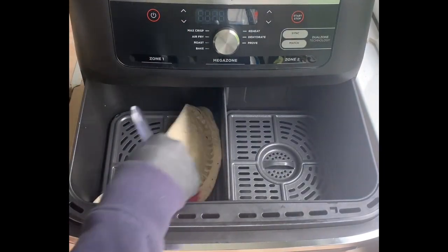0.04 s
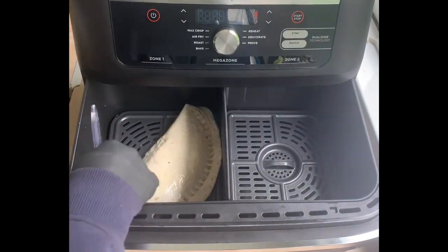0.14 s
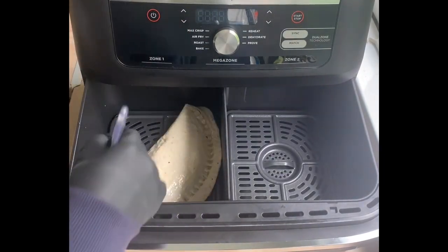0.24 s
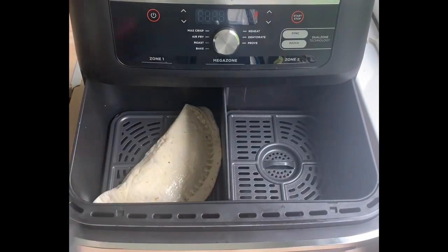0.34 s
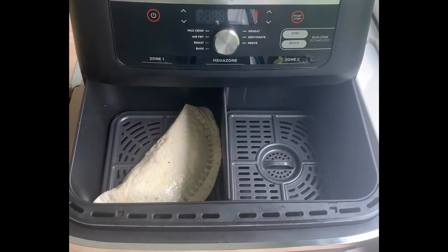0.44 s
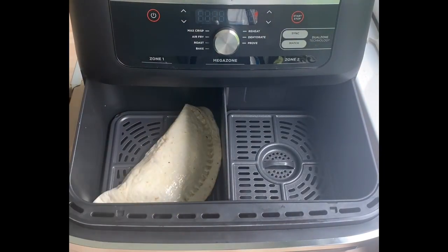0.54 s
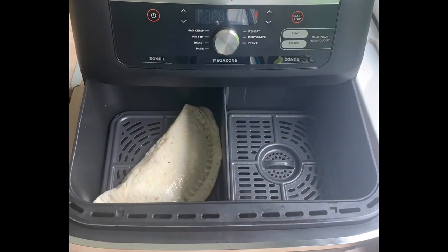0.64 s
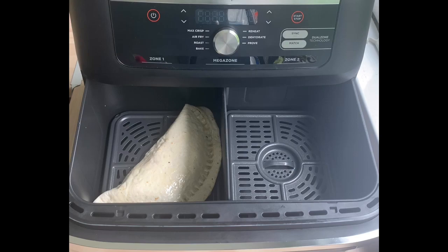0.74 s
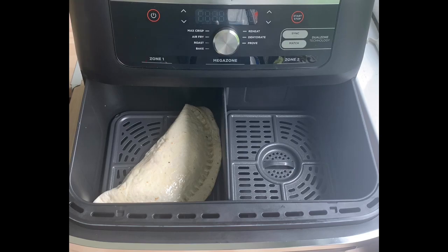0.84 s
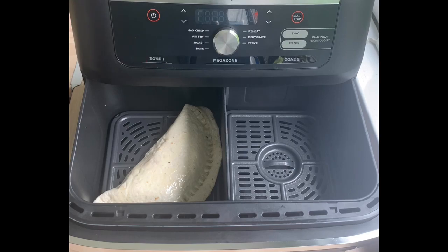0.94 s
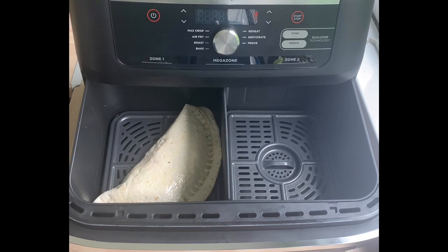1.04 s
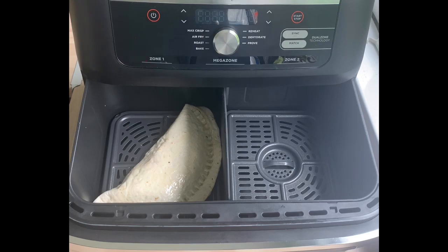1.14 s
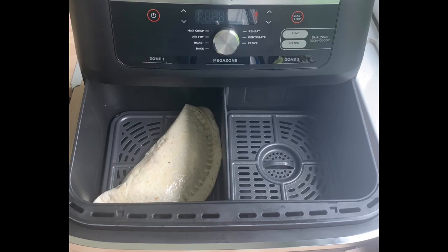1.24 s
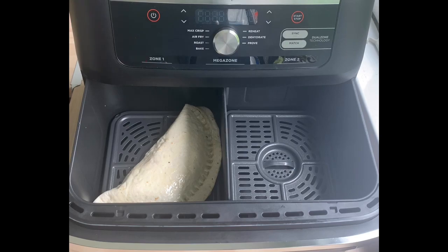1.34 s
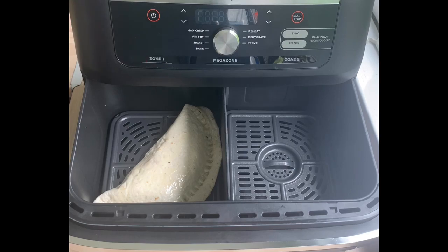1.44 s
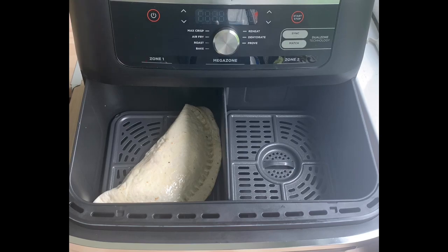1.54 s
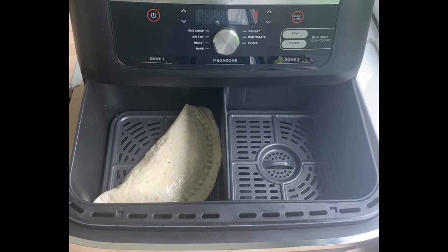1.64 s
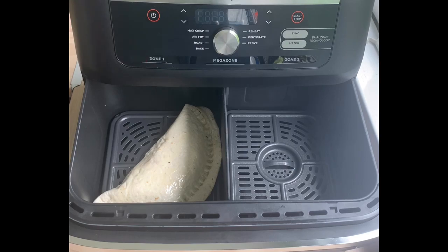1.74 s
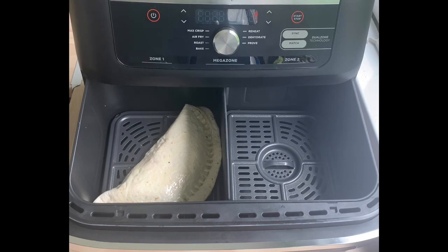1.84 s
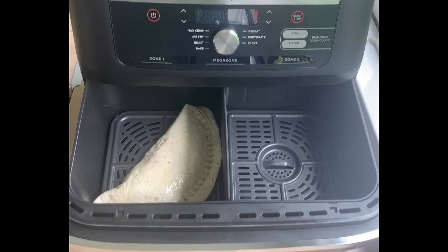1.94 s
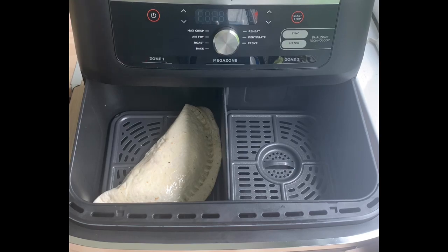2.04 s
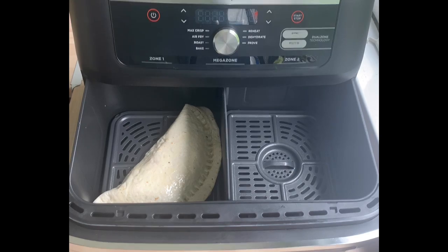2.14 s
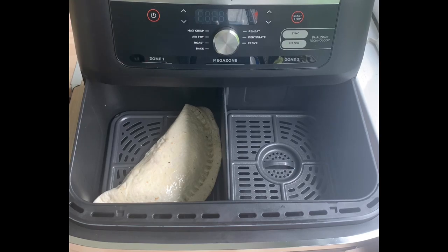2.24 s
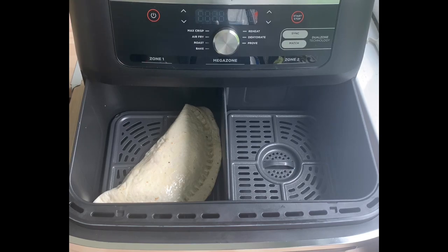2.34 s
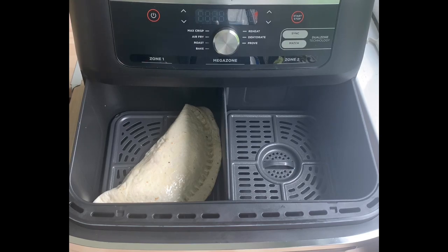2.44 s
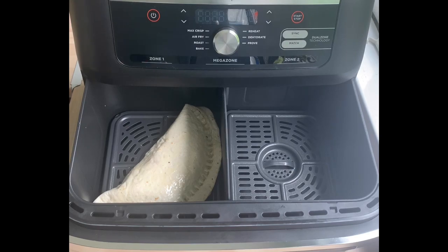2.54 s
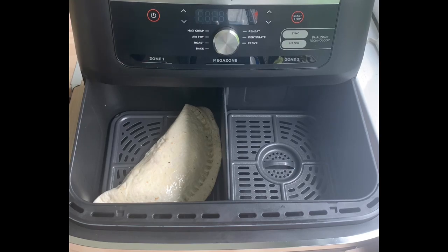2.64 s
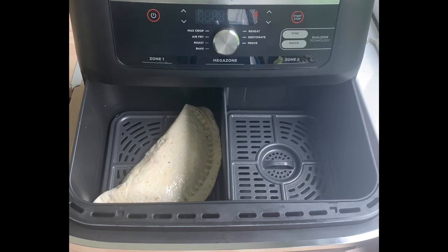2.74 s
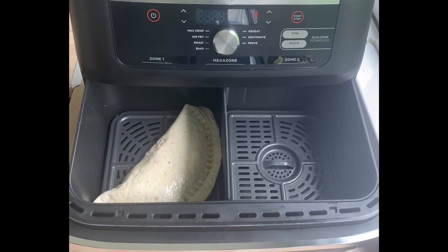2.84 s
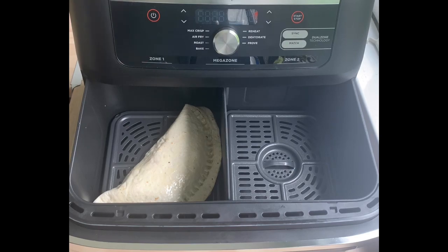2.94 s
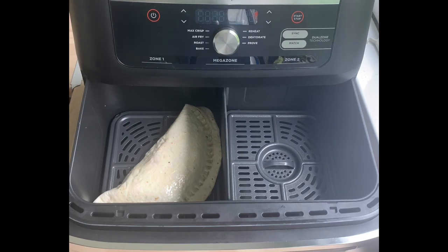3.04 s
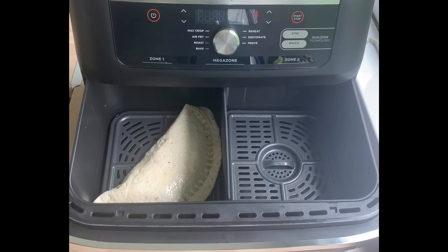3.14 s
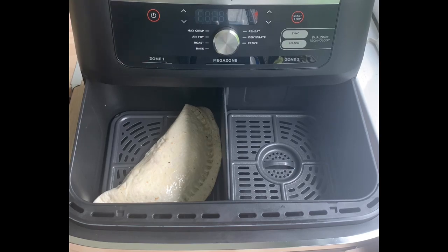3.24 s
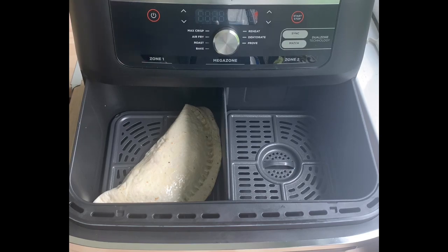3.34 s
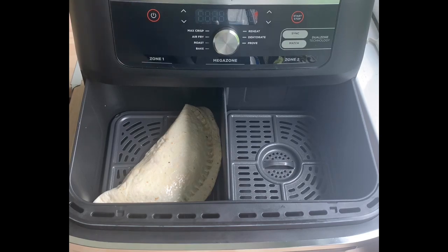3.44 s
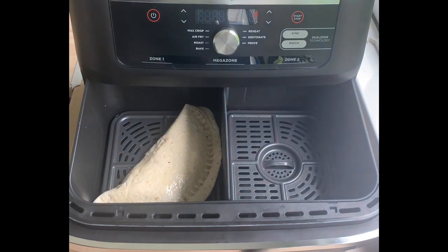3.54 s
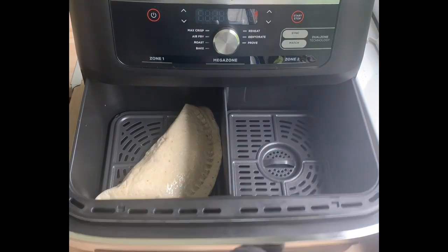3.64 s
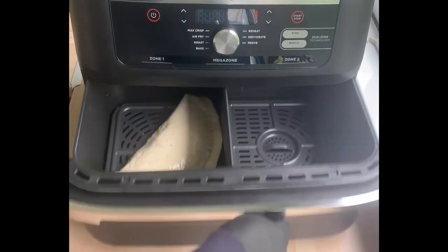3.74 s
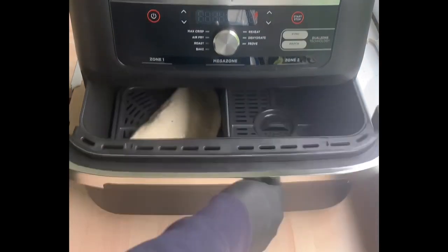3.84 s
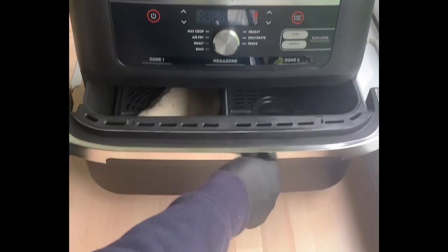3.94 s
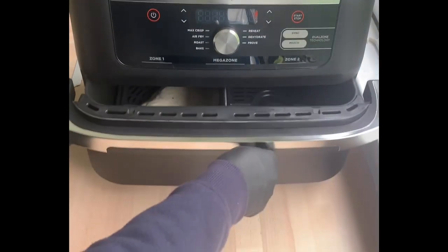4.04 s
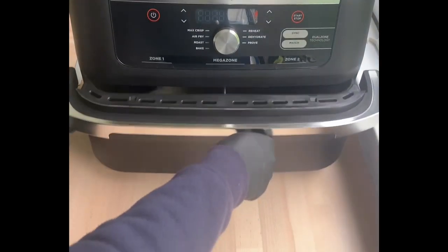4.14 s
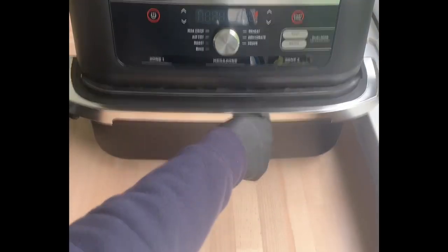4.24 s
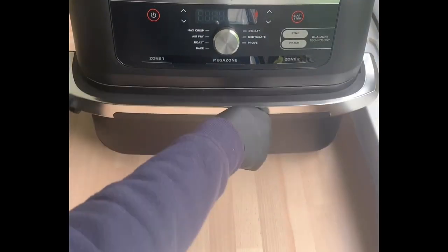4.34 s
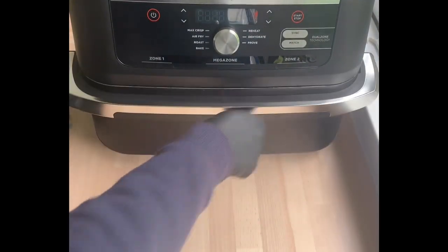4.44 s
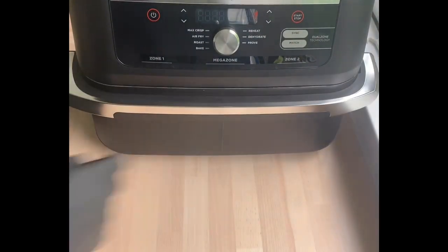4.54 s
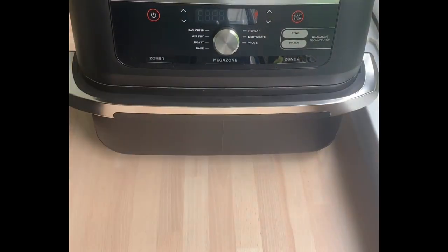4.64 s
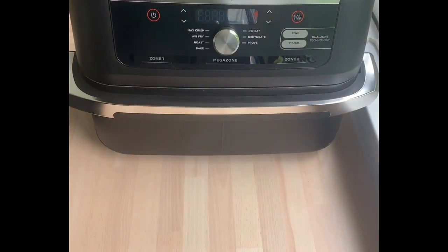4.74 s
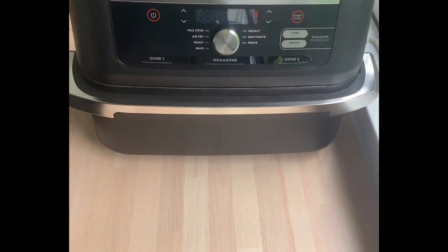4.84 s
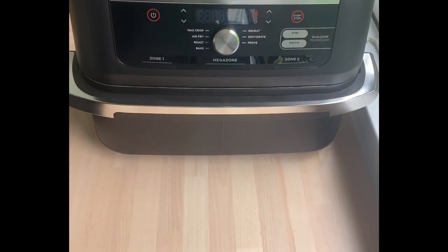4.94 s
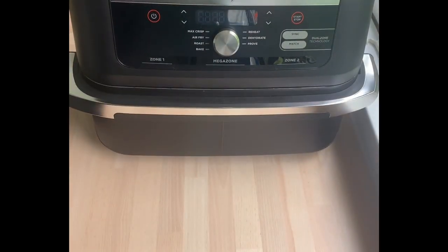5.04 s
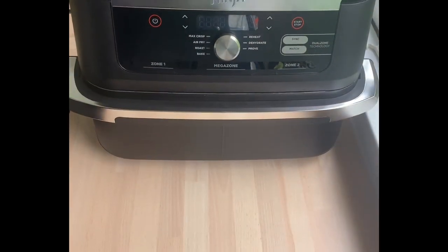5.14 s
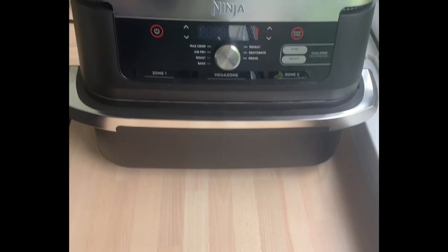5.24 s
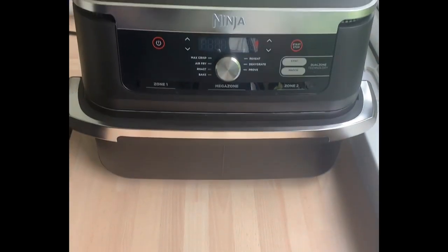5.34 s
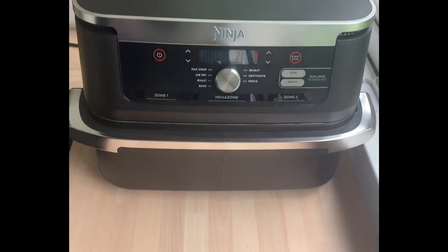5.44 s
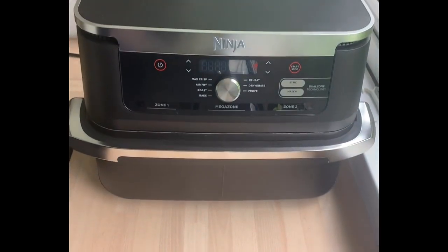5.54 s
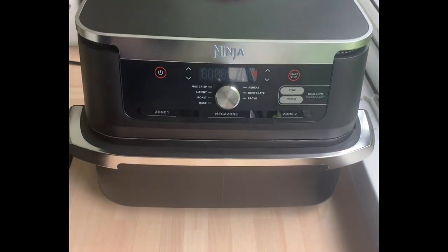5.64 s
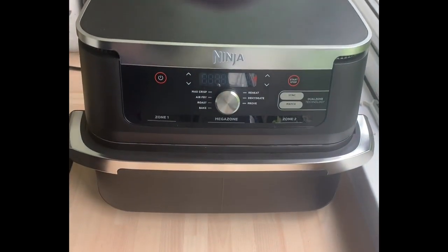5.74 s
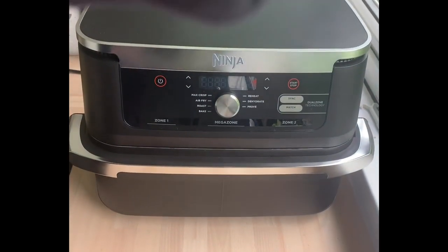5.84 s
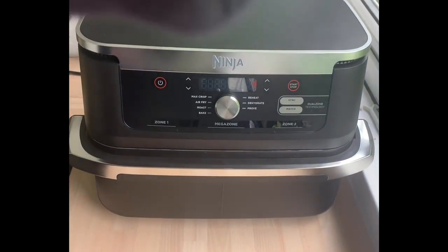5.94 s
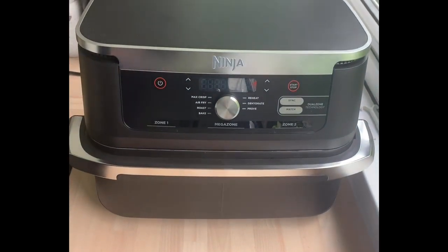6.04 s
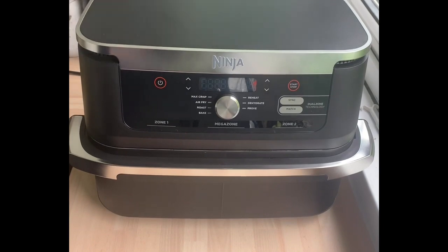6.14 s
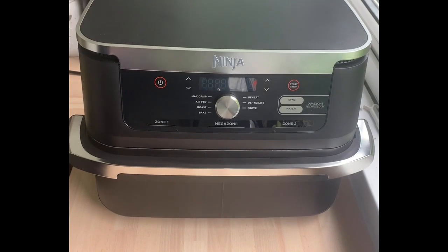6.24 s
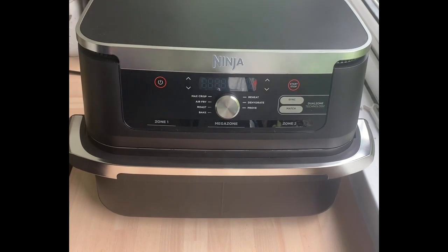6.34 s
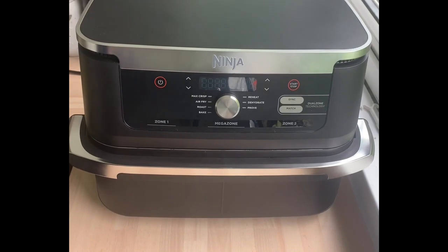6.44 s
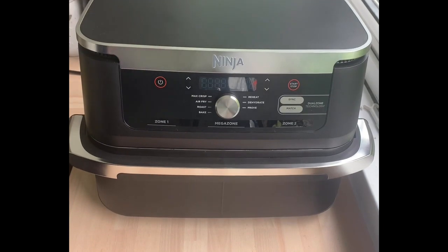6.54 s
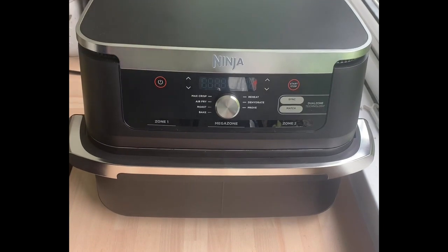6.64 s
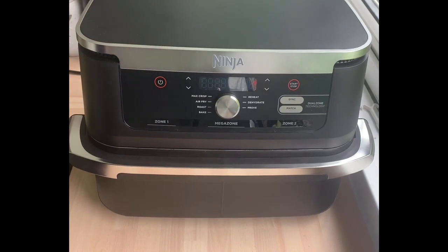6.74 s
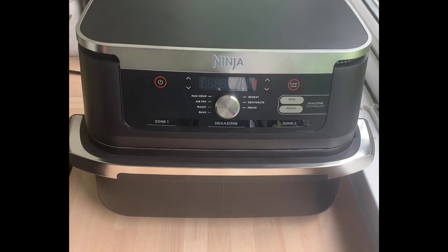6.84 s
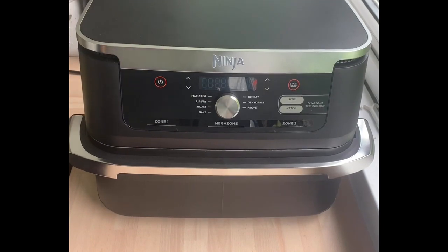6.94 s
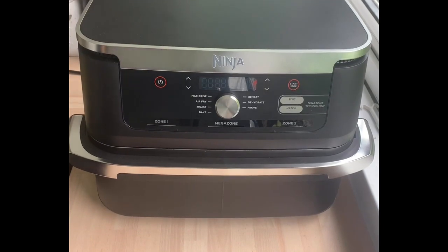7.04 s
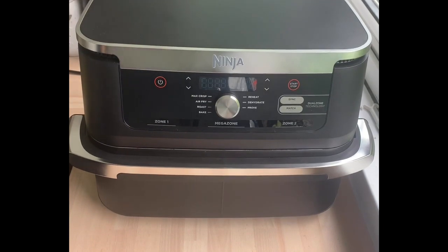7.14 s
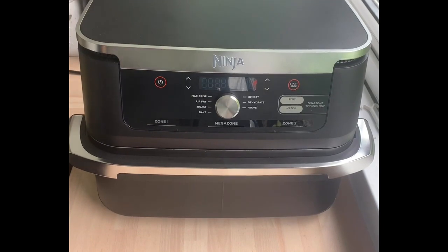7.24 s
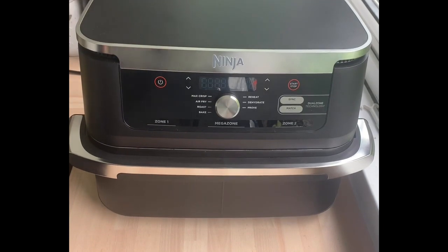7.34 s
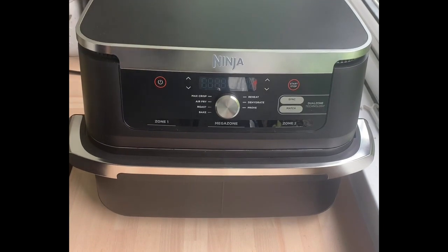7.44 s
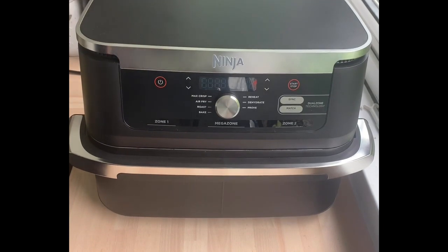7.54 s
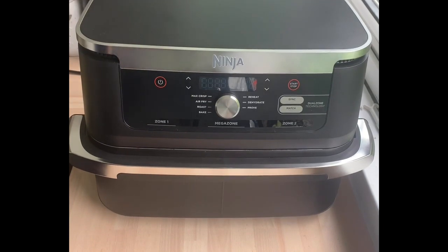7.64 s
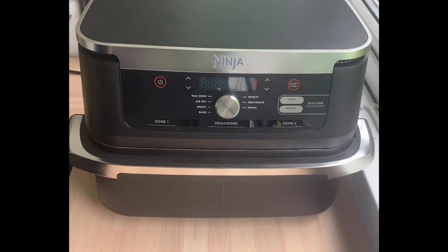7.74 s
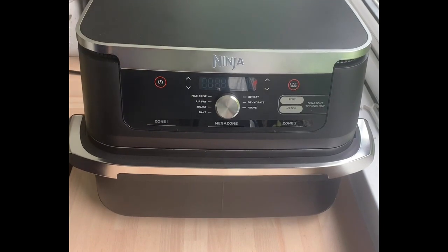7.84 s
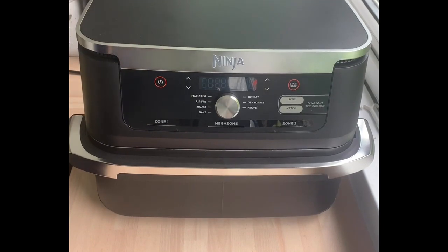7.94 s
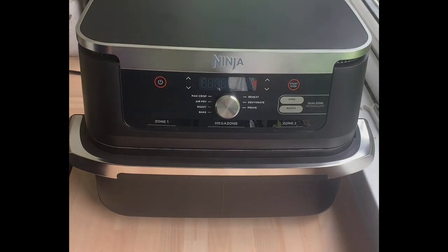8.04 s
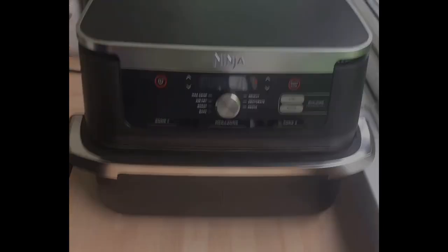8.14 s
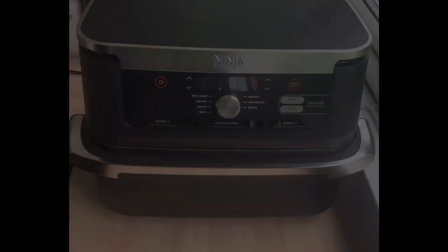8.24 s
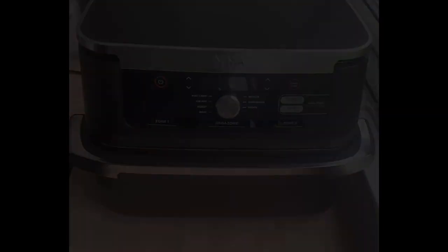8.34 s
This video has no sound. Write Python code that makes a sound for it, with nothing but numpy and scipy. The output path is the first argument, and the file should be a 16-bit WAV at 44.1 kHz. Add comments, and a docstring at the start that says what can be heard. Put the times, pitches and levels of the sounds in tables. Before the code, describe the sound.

A low, faint room tone runs throughout in a quiet kitchen, heard through a close hand-held microphone. From about 0.3 seconds a sleeve rustles softly. Near 1 second a utensil is put down with a brief scrape and light clicks. Dull worktop knocks follow, with a bright clink near 1.9 seconds and a small hollow clunk around 2.4. From 3.6 seconds an air fryer drawer is pushed in, much louder: it rumbles, rubs and bumps along its plastic runners, briefly ringing its metal pan and the cabinet. It slows around 4 seconds, bumps again, then the latch snaps and the front knocks home sharply near 4.4. Fingers tap on the microphone's case around 5 seconds, and once more strongly at 6. A few small clicks and a soft knock come near 7 seconds, and light handling taps just after 8.

```python
"""An air fryer in a quiet kitchen, close in front of a hand-held microphone, over a low room tone. First a
sleeve rustles, a utensil is put down with a scrape and light clicks, and things knock and clunk on the worktop;
someone breathes faintly twice. From 3.6 s the drawer is pushed in: it rumbles and bumps along its runners,
ringing its metal pan and the cabinet, until the latch snaps and the front knocks home near 4.4 s. Afterwards
fingers tap on the microphone's case and a few small things click nearby."""
import sys
import numpy as np
from scipy import signal
from scipy.fft import rfft, irfft, next_fast_len
from scipy.io import wavfile
from scipy.ndimage import map_coordinates

SR = 44100
rng = np.random.default_rng(int(sys.argv[2]) if len(sys.argv) > 2 else 0)


def int16_out(signal):
    """Quantize to a 16-bit WAV file."""
    q = np.round(np.clip(np.atleast_2d(signal).T, -1, 1) * 32767)
    wavfile.write(sys.argv[1], SR, q.astype(np.int16))


N = 369999
TIME = np.arange(N) / SR
AGE = TIME[:SR // 2]   # time since a contact [s]
SIDES = np.array([[1], [-1]])   # left, right

# how alike the microphone's two channels are: (frequency [Hz], correlation [-1..1])
STEREO_LIKENESS = [(100, 0.91), (550, 0.85), (850, 0.39), (1400, 0.2), (2800, -0.34), (5000, -0.2),
                   (10000, 0.29)]
# the quiet kitchen: (frequency [Hz], level [dB])
ROOM_SPECTRUM = [(25, -34), (55, -23.5), (85, 0), (150, -3), (200, 3.5), (240, -11.5), (310, 4.5), (355, 3),
                 (420, -12), (620, -9), (850, -13.5), (1400, -24.5), (3500, -32.5), (11000, -39.5)]
# low ring left in the cabinet and the room: (frequency [Hz], level [dB])
AFTERRING_SPECTRUM = [(60, -31.5), (105, 2.5), (180, -8.5), (270, -4), (330, -6), (400, -15), (600, -9.5),
                      (1000, -21), (3000, -37.5)]
# sleeve and hand, and two faint breaths near 2.9 s and 3.5 s: (middle [s], half length [s], level [dB], corner
# [Hz], treble fall [dB/octave])
RUSTLES_AND_BREATHS = [(.386, 0.066, -61, 3660, 7), (0.506, 0.091, -57.5, 5650, 7), (0.796, 0.046, -59, 4400, 9),
                       (1.12, 0.081, -56.5, 2600, 10), (2.139, 0.11, -57.5, 1880, 10),
                       (2.409, 0.061, -55, 1080, 9), (2.627, 0.09, -52.5, 6130, 9),
                       (2.787, 0.05, -62.5, 2000, 24), (2.94, 0.19, -67.5, 2150, 26),
                       (3.458, 0.19, -66, 4700, 8), (4.679, 0.29, -70, 2480, 8), (5.075, 0.058, -68, 3940, 7),
                       (5.088, 0.05, -54, 1100, 17), (6.521, 0.11, -65.5, 1986, 10),
                       (7.343, .15, -64.5, 5020, 8), (7.452, 0.042, -61, 2185, 9), (8.123, 0.028, -53, 1000, 9)]
# fingers right on the microphone: (time [s], level [dB], pitch [Hz], hollow ring [dB])
MICROPHONE_TAPS = [(4.9272, -34, 560, -44), (5.082, -46, 1000, -58), (5.137, -47.5, 930, -62),
                   (5.192, -57, 700, -52), (5.9748, -21.5, 360, -36), (8.130, -44, 565, -47.5),
                   (8.150, -34.5, 185, -48)]
# the microphone's hollow case: (frequency [Hz], level [dB])
CASE_SPECTRUM = [(70, -34), (120, 1), (250, -1.5), (370, -1.5), (520, -2), (900, -5.5), (1500, -20.5),
                 (2500, -29.5), (6000, -57)]
# resonances of the dragged utensil: (frequency [Hz], width [Hz], level [dB])
SCRAPE_MODES = [(1800, 280, -2.5), (2300, 270, 5.5), (2640, 210, 1), (3150, 280, -4), (3700, 270, -8),
                (4160, 200, -11), (4550, 240, -4), (5200, 340, -10), (8200, 580, 3)]
# utensil and other small hard things nearby: (time [s], click [dB], centre [Hz], t60 [s], ring [dB])
LIGHT_CLICKS = [(.365, -63, 2500, 0.1, -70), (0.608, -65.5, 3000, 0.13, -73), (.678, -54, 3020, 0.06, -59),
                (.862, -55, 2800, 0.055, -59), (.887, -51, 2500, 0.045, -60),
                (.9515, -35.5, 5700, 0.051, -47), (0.968, -46, 3780, .06, -52),
                (0.995, -50, 4230, 0.13, -60), (1.096, -58, 2010, .05, -66), (1.1111, -39, 3800, .055, -50),
                (1.134, -55, 2200, .06, -61), (1.478, -68, 4200, 0.13, -77),
                (1.593, -52.5, 2640, 0.15, -52), (1.746, -68.5, 5040, 0.1, -74),
                (1.782, -70.5, 4870, 0.089, -72), (1.867, -67.5, 3570, 0.21, -79),
                (1.923, -41, 3140, 0.19, -54), (1.9298, -32.5, 4300, .07, -29.5),
                (2.014, -58, 2960, .08, -58), (2.09, -58.5, 6760, 0.13, -80),
                (2.417, -54.5, 3000, 0.12, -62), (5.956, -57, 7970, 0.054, -80),
                (6.844, -47.5, 2880, 0.25, -65), (6.939, -51.5, 3070, .13, -51),
                (6.952, -38, 5700, .14, -60), (8.114, -54, 7500, .08, -72)]
# the struck utensil: (frequency [Hz], level [dB], t60 [s])
UTENSIL_MODES = [(2485, -10, 0.077), (2720, -10, .1), (3030, -8.5, 0.13), (3150, -6, 0.066),
                 (3930, -7.5, 0.092), (4000, -12, 0.13), (4600, -18, .12), (4840, -12, .08),
                 (5580, -12, .11), (5720, -12, 0.12), (6460, -19, .09), (6573, -20, 0.11),
                 (6950, -21, 0.13), (7400, -24, .14), (7600, -17, .06), (9300, -24, .16)]
# something shoved aside judders: (time [s], level [dB])
CLUNK_JUDDERS = [(2.376, -44.5), (2.3825, -45.5), (2.396, -44.5), (2.418, -52), (2.4395, -46.5)]
# that hollow object's ring: (frequency [Hz], level [dB], t60 [s])
CLUNK_MODES = [(525, -8, .08), (585, 2.5, 0.118), (705, -1.5, 0.17), (1063, -4, .05), (1417, -3.5, 0.083),
               (2024, -3, 0.076), (2230, -5, .07)]
# dull knocks on the worktop: (time [s], thump [dB], pitch [Hz], board [dB], hollow sound [dB])
WORKTOP_KNOCKS = [(.395, -66, 300, -53, -62), (.887, -47, 323, -56, -49), (.978, -56.5, 300, -57, -54),
                  (1.48, -54, 320, -68, -68), (1.593, -37, 293, -47.5, -50.5),
                  (1.747, -52.5, 303, -70, -75), (1.921, -60, 345, -45.5, -41),
                  (2.119, -38, 325, -46, -38.5), (2.375, -43, 450, -61, -46), (2.428, -45, 280, -54.5, -47),
                  (3.096, -61.5, 297, -54, -59.5), (6.855, -52, 300, -48.5, -48.5),
                  (8.177, -43.5, 110, -67, -64)]
# the worktop's hollow sound: (frequency [Hz], level [dB])
WORKTOP_SPECTRUM = [(60, -61), (120, 3.5), (200, -9.5), (320, 1.5), (450, -10), (650, -11.5), (1200, -23),
                    (3000, -85)]
# the body, cabinet and drawer together: (frequency [Hz], t60 [s], level open [dB], level shut [dB])
BODY_MODES = [(104, 0.18, -16.5, -20), (152, .12, -22, -18.5), (212, .15, -26, -15),
              (245, .14, -28.5, -18.5), (316, 0.11, -26, -13), (361, 0.15, -14, -13.5),
              (389, .14, -16.5, -28), (433, 0.19, -14.5, -23.5), (453, 0.12, -13, -26),
              (498, 0.043, -25, -22), (563, .10, -26, -23)]
# the drawer's metal pan: (frequency [Hz], t60 [s], level open [dB], level shut [dB])
METAL_PAN_MODES = [(616, 0.18, -1, -13), (740, 0.18, -19.5, -4.5), (775, .15, -14.5, 1),
                   (840, 0.17, -1, -14), (926, .10, -8, -19), (1128, .14, -11.5, -19),
                   (1233, .10, -25, -11.5), (1324, .13, -24.5, -9), (1436, .09, -10, -21),
                   (1590, .06, -21.5, -18.5), (1810, .10, -14, -17.5), (2070, .08, -12, -17),
                   (2380, .08, -26, -20), (2610, 0.088, -24, -10.5), (2800, 0.11, -18.5, -23),
                   (2910, .10, -18.5, -24.5), (3260, .06, -27, -20.5), (3460, .09, -18, -25.5)]
# the drawer is pushed in, checked, then pressed home: (time [s], speed [share of top speed])
DRAWER_SPEED = [(3.57, 0.044), (3.70, 0.33), (3.81, 0.97), (3.90, 0.82), (4.03, 0.34), (4.14, 0.52),
                (4.27, 0.62), (4.39, 0.2)]
# it binds on entering the cabinet and at the seal: (start [s], length [s], extra rumble [dB])
DRAWER_BINDS = [(3.785, .125, 10.5), (4.205, 0.06, 18.5)]
# the loose basket rattling: (frequency [Hz], level [dB])
BASKET_SPECTRUM = [(90, -2.5), (200, -5.5), (420, -5), (600, -7), (850, -6), (1200, -21), (2000, -29),
                   (4000, -28.5), (9000, -50)]
# plastic rubbing on the runners: (frequency [Hz], level [dB])
RUBBING_SPECTRUM = [(300, 3), (800, 6), (1300, -1.5), (2000, 0), (3200, -1.5), (4200, -6), (5500, -9.5),
                    (8000, -13), (12000, -20)]
# bumps on the runners: (time [s], thump [dB], pitch [Hz], clack [dB], pan ring [dB], body ring [dB])
RUNNER_BUMPS = [(3.590, -47, 111, -72, -70, -48), (3.635, -45, 300, -57, -49, -45),
                (3.656, -41.5, 278, -56, -50, -42), (3.682, -39.5, 107, -64.5, -62.5, -37),
                (3.7561, -15.5, 475, -29.5, -20.5, -26), (3.774, -23, 490, -46, -45, -28),
                (3.8008, -26.5, 600, -33.5, -28, -31), (3.8060, -21, 350, -44, -45, -25),
                (3.826, -29, 110, -52, -45, -38), (3.8505, -25, 590, -41, -33.5, -29),
                (3.859, -28, 108, -52, -45, -33), (3.8765, -24, 340, -47, -40, -30),
                (3.9187, -15.5, 425, -46, -32, -18), (3.9275, -24, 410, -48, -38, -25),
                (4.1985, -38, 350, -32.5, -35, -34), (4.2052, -25, 290, -40, -30.5, -23),
                (4.2218, -21, 270, -45.5, -48, -21), (4.234, -28, 120, -38, -39, -31),
                (4.2533, -19, 320, -31, -22, -22), (4.259, -23, 260, -47.5, -50, -24),
                (4.2645, -28, 130, -27.5, -26, -29), (4.2736, -21.5, 250, -38.5, -33, -22.5)]
# mid-range clack of struck plastic: (frequency [Hz], level [dB])
CLACK_SPECTRUM = [(250, -19.5), (500, -1), (850, 0.5), (1200, -7.5), (1900, -5.5), (2800, -12.5),
                  (4000, -18.5), (7000, -41.5), (12000, -50)]
# bright crack of a hard contact: (frequency [Hz], level [dB])
CRACK_SPECTRUM = [(700, -25), (2000, -16.5), (3200, 0.5), (4300, -2.5), (5600, -1), (7500, -4), (9000, -3),
                  (11000, -8.5), (13000, -8)]
# short-lived modes of the plastic latch: (frequency [Hz], level [dB])
LATCH_MODES = [(2794, -7.5), (4310, -9.5), (4716, -8), (5140, -6.5), (5490, -5.5), (5585, -5), (5890, -7),
               (6164, -7), (6550, -6.5), (7150, -8), (7382, -5), (7481, -6), (7940, -6.5), (9647, -6.5),
               (10800, -10), (11580, -9.5)]

BODY_SHUT_S, PAN_SHUT_S = (3.93, 4.2), (3.86, 3.93)   # each passes from its open to its shut ring
ENTER_S, LATCH_S, SEAT_S = 3.8, 4.3485, 4.3675   # the drawer enters the cabinet, latches, knocks home


def amp(db):
    """Decibels to gain."""
    return 10 ** (np.asarray(db) / 20)


def rms_one(x):
    """Scale to rms 1."""
    return x / np.sqrt(np.mean(x ** 2) + 1e-20)


def at_hz(points, hz):
    """Read a table along log frequency."""
    freqs, values = np.transpose(points)
    return np.interp(np.log(hz + 1e-3), np.log(freqs), values)


def dying(t60, t=AGE):
    """Exponential decay, 60 dB in t60 seconds."""
    return np.exp(-np.log(1000) * t / t60)


def envelope(start, attack, hold, t60):
    """Straight rise, hold, exponential release."""
    t = TIME - start
    return np.clip(t / attack, 0, 1) * dying(t60, np.maximum(t - attack - hold, 0))


def add(out, s, sound):
    """Mix a sound in at time s."""
    start = round(s * SR)
    out[..., start:start + sound.shape[-1]] += sound[..., :N - start]


def low_cut(x, hz, order):
    """Roll off the bass below hz."""
    return signal.sosfilt(signal.butter(order, hz, "high", fs=SR, output="sos"), x + 1e-18)


def excite(force, response):
    """A force played through a stereo impulse response."""
    return signal.oaconvolve([force], response, axes=1)[:, :N]


def noise(spectrum, size=len(AGE)):
    """Stereo noise of a given colour, alike in both channels in the bass only; rms 1."""
    length = next_fast_len(size)
    hz = np.fft.rfftfreq(length, 1 / SR)
    alike = at_hz(STEREO_LIKENESS, hz)
    mid, side = rfft(rng.standard_normal((2, length)))
    stereo = np.sqrt(1 + alike) * mid + np.sqrt(1 - alike) * side * SIDES
    return rms_one(irfft(stereo * amp(at_hz(spectrum, hz)), length)[:, :size])


def hump(hz, below_db, above_db):
    """A broad spectrum round hz, falling by so many dB an octave for four octaves on each side."""
    return [(hz / 16, -4 * below_db), (hz, 0), (hz * 16, -4 * above_db)]


def wander(per_s, size):
    """A random curve with per_s new values a second."""
    steps = rng.standard_normal(int(size / SR * per_s) + 2)
    return np.interp(TIME[:size] * per_s, np.arange(len(steps)), steps)


def grain(per_s, depth_db, size=N):
    """A randomly wavering gain; rms 1."""
    return rms_one(amp(depth_db * wander(per_s, size)))


def slips(per_s):
    """Stick-slip: small impulses of random size at random times."""
    return rng.standard_normal(N) * (rng.random(N) < per_s / SR)


def ringing(modes):
    """Ring of (frequency [Hz], level [dB], t60 [s]) modes; high ones reach the channels out of step."""
    out = 0
    for hz, db, t60 in modes:
        skew = np.arccos(at_hz(STEREO_LIKENESS, hz)) / 2
        out = out + amp(db) * dying(t60) * np.sin(2 * np.pi * hz * AGE + skew * SIDES)
    return out * (1 - np.exp(-AGE / 0.0025))   # the vibration takes a moment to spread


def thump(hz, cycles, sharpness):
    """A heavily damped panel swings for a few cycles after a blunt contact."""
    swell = AGE * hz / cycles
    return (swell * np.exp(1 - swell)) ** sharpness * np.sin(2 * np.pi * hz * AGE)


def crowded_modes(x, spacing_hz=105, depth_db=6.0):
    """Plastic shells have many close modes: a fine comb of random peaks and dips above the bass."""
    length = next_fast_len(x.shape[-1])
    hz = np.fft.rfftfreq(length, 1 / SR)
    heights = rng.standard_normal(int(SR / spacing_hz))
    comb_db = depth_db * np.interp(hz / spacing_hz, np.arange(len(heights)), heights) * hz / (hz + 1000)
    return rms_one(irfft(rfft(x, length) * amp(comb_db), length)[:, :x.shape[-1]])


def burst(spectrum, t60, snap, snap_t60):
    """Dense high modes of a hard thing: a brief direct snap, then a short diffuse ring."""
    rise = 1 - np.exp(-AGE / 0.0011)
    return crowded_modes(noise(spectrum)) * rise * (dying(t60) + snap * dying(snap_t60))


def brushing(corner_hz, fall_db, size=N):
    """Friction noise: fine grains that come in gentle clumps."""
    fibres = crowded_modes(noise(hump(corner_hz, below_db=0, above_db=fall_db), size))
    clumps = grain(per_s=45, depth_db=1.8, size=size)
    return fibres * grain(per_s=250, depth_db=2, size=size) * clumps


def room_tone():
    """The kitchen behind it all: faint low noise whose level wavers a little."""
    waver = grain(per_s=10, depth_db=1.5)
    return amp(-60.2) * noise(ROOM_SPECTRUM, N) * waver


def afterring(sounds):
    """The cabinet and the room keep a faint low ring long after the blows."""
    t = TIME[:2 * SR]
    tail = noise(AFTERRING_SPECTRUM, len(t)) * dying(1.9, t)
    tail /= np.sqrt(np.sum(tail[0] ** 2))
    return amp(-35.5) * excite(sounds.mean(0), tail)


def rustles_and_breaths():
    """Cloth and skin brush near the microphone in short rounded swells; two faint breaths come in the same way."""
    out = np.zeros((2, N))
    for s, half_s, db, corner_hz, fall_db in RUSTLES_AND_BREATHS:
        size = round(2 * half_s * SR)
        add(out, s - half_s, amp(db) * np.hanning(size) ** 1.9 * brushing(corner_hz, fall_db, size))
    return out


def finger_taps(first_hz=1800, settle_s=0.0021):
    """Bending waves in the microphone's case bring the highs first: taps chirp down to a hollow ring."""
    out = np.zeros((2, N))
    contact = 1 - np.exp(-AGE / 0.0008)
    for s, db, hz, hollow_db in MICROPHONE_TAPS:
        phase = 2 * np.pi * (hz * AGE + (first_hz - hz) * settle_s * (1 - np.exp(-AGE / settle_s)))
        chirp = amp(db - 4.5) * dying(0.052) * np.sin(phase - 0.54 * SIDES)
        hollow = amp(hollow_db) * noise(CASE_SPECTRUM) * dying(0.12)
        tick = amp(db - 28.5) * burst(CRACK_SPECTRUM, t60=0.046, snap=1.7, snap_t60=0.0044)
        add(out, s, contact * (chirp + hollow) + tick)
    return out


def utensil_scrape():
    """The utensil drags as it is put down: it hisses and crackles, each slip catching one resonance."""
    corners_s = 0.774 + np.cumsum([0, 0.095, 0.14, 0.067])   # start, rise, hold, release
    pressure = np.interp(TIME, corners_s, [0, 1, 1, 0])
    modes = [(hz, db, np.log(1000) / (np.pi * width)) for hz, width, db in SCRAPE_MODES]
    crackle = sum(excite(slips(per_s=81), ringing([mode])) for mode in modes)
    hiss = brushing(corner_hz=4600, fall_db=7)
    return pressure * (amp(-57) * rms_one(crackle) + amp(-57.5) * hiss)


def clicks(spread_db=0.5):
    """Light hard contacts nearby; each one strikes the utensil's modes a little differently."""
    out = np.zeros((2, N))
    for s, db, centre_hz, t60, ring_db in LIGHT_CLICKS:
        spectrum = hump(centre_hz, below_db=3, above_db=12)
        add(out, s, amp(db) * burst(spectrum, t60, snap=0.21, snap_t60=0.0094))
        modes = [(hz, level + rng.normal(0, spread_db), decay) for hz, level, decay in UTENSIL_MODES]
        add(out, s, amp(ring_db) * ringing(modes))
    return out


def clunk(dulling_db_per_s=134):
    """Gritty slips ring a shoved hollow object, ever duller as the contact softens and comes to rest."""
    out = np.zeros((2, N))
    for s, db in CLUNK_JUDDERS:
        dull_db = -dulling_db_per_s * (s - CLUNK_JUDDERS[0][0])
        modes = [(hz, level + dull_db * (hz > 1000), t60) for hz, level, t60 in CLUNK_MODES]
        grit = burst(hump(1500, below_db=2.5, above_db=13), t60=0.075, snap=0.6, snap_t60=0.015)
        add(out, s, amp(db) * (ringing(modes) + amp(dull_db - 4.5) * grit))
    return out


def worktop_knocks(board_hz=127, board_lag_s=0.015):
    """Things set down thump and ring briefly at their own pitch; the worktop answers, low and hollow."""
    out = np.zeros((2, N))
    board = thump(board_hz, cycles=2.6, sharpness=6.6) + ringing([(board_hz, -7, 0.38)])
    spreading = 1 - np.exp(-AGE / 0.002)
    for s, db, hz, board_db, hollow_db in WORKTOP_KNOCKS:
        struck = thump(hz, cycles=1.9, sharpness=7.6) + ringing([(hz, -5, 0.1)])
        hollow = noise(WORKTOP_SPECTRUM) * spreading * dying(0.18)
        add(out, s, amp(db) * struck + amp(hollow_db) * hollow)
        add(out, s + board_lag_s, amp(board_db) * board)
    return low_cut(out, hz=79.55, order=3)


def open_or_shut(force, modes, shutting_s):
    """The drawer's modes change strength as it disappears into the cabinet."""
    shut = np.interp(TIME, shutting_s, [0, 1])
    when_open = ringing([(hz, db, t60) for hz, t60, db, _ in modes])
    when_shut = ringing([(hz, db, t60) for hz, t60, _, db in modes])
    return excite(force * (1 - shut), when_open) + excite(force * shut, when_shut)


def detuned(x):
    """The grip of the runners keeps shifting, so the resonances of the sliding drawer waver in pitch."""
    rate = 1 + 0.05 * wander(per_s=22, size=N)
    return np.array([map_coordinates(channel, [np.cumsum(rate)], order=3) for channel in x])


def drawer_slide(bind_attack_s=0.043):
    """Slips on the runners shake body, pan and loose basket; the plastic hisses and catches on grit."""
    speed = np.interp(TIME, *np.transpose(DRAWER_SPEED), left=0, right=0)
    binding = sum(amp(db) * envelope(s, bind_attack_s, length - bind_attack_s, t60=0.14)
                  for s, length, db in DRAWER_BINDS)
    force = slips(per_s=310)
    body = rms_one(open_or_shut(force, BODY_MODES, BODY_SHUT_S))
    pan = rms_one(open_or_shut(force, METAL_PAN_MODES, PAN_SHUT_S))
    basket = rms_one(excite(force, noise(BASKET_SPECTRUM) * dying(0.045)))
    shaking = detuned(amp(-3) * body + amp(-10) * pan + amp(-8) * basket)
    rubbing = detuned(crowded_modes(noise(RUBBING_SPECTRUM, N))) * grain(per_s=300, depth_db=2)
    grit = rms_one(excite(slips(per_s=200), noise(RUBBING_SPECTRUM) * dying(0.012)))
    rumble = amp(-40.5) * speed * (1 + binding) * shaking * grain(per_s=38, depth_db=3)
    hiss = amp(-38) * speed ** 2.4 * (rubbing + amp(-9) * grit)
    return rumble + hiss


def drawer_contacts(hardening_db_per_s=26, rebound_s=0.0125):
    """Each blow: (time [s], thump [dB], pitch [Hz], clack [dB], crack [dB], pan [dB], body [dB])."""
    bumps = []
    for s, db, hz, clack_db, pan_db, body_db in RUNNER_BUMPS:
        crack_db = clack_db - 27 + hardening_db_per_s * (s - ENTER_S)   # harder further in
        bumps.append((s, db, hz, clack_db, crack_db, pan_db, body_db))
    snap = (LATCH_S, -50, 890, -42, -24.5, -43, -50)   # the latch snaps over its catch
    drop = (LATCH_S + 0.004, -50, 890, -34.5, -27.5, -43, -50)   # and drops in behind it
    seat = (SEAT_S, -9.5, 410, -31, -33, -27, -10.5)   # the front knocks home
    # then rebounds twice, lower and duller
    rebounds = [(SEAT_S + k * rebound_s, -19.5, 345, -46, -48, -42, -19.5) for k in (1, 2)]
    return bumps + [snap, drop, seat] + rebounds


def drawer_hits():
    """Each contact thumps a panel, clacks the plastic, shakes the latch and rings the pan and body."""
    out, body_force, pan_force = np.zeros((2, N)), np.zeros(N), np.zeros(N)
    latch = ringing([(hz, db, 0.12) for hz, db in LATCH_MODES])
    for s, thump_db, hz, clack_db, crack_db, pan_db, body_db in drawer_contacts():
        panel = thump(hz, cycles=1.3, sharpness=4.4) + ringing([(hz, -8, 0.07)])
        clack = burst(CLACK_SPECTRUM, t60=0.14, snap=1.2, snap_t60=0.03)
        crack = burst(CRACK_SPECTRUM, t60=0.14, snap=2.4, snap_t60=0.035)
        add(out, s, amp(thump_db) * panel + amp(clack_db) * clack)
        add(out, s, amp(crack_db - 4) * crack + amp(crack_db - 5.5) * latch)
        body_force[round((s + 1 / hz) * SR)] = amp(body_db)   # the body follows a cycle later
        pan_force[round(s * SR)] = amp(pan_db)
    seal_grip = amp(np.interp(TIME, [4.398, 4.406], [0, -4]))   # once home, the seal damps the drawer
    body = amp(4.5) * seal_grip * open_or_shut(body_force, BODY_MODES, BODY_SHUT_S)
    pan = open_or_shut(pan_force, METAL_PAN_MODES, PAN_SHUT_S)
    return out + body + pan


def scene():
    """The drawer close in front of the microphone, small noises round it, the kitchen behind."""
    drawer = low_cut(drawer_hits() + drawer_slide(), hz=79, order=5)   # too small to radiate deep bass
    drawer *= amp(-0.5 * SIDES)   # a touch to the right
    sounds = drawer + worktop_knocks() + clicks() + clunk() + utensil_scrape()
    sounds += finger_taps() + rustles_and_breaths()
    return sounds + room_tone() + afterring(sounds)


def record(dry):
    """The microphone drops the lowest rumble; the top is cut steeply at 11.9 kHz."""
    high_cut = signal.ellip(10, 0.3, 70, 11900, fs=SR, output="sos")
    return signal.sosfilt(high_cut, low_cut(dry, hz=22, order=2))


dry = scene()
out = record(dry)
int16_out(out)
```